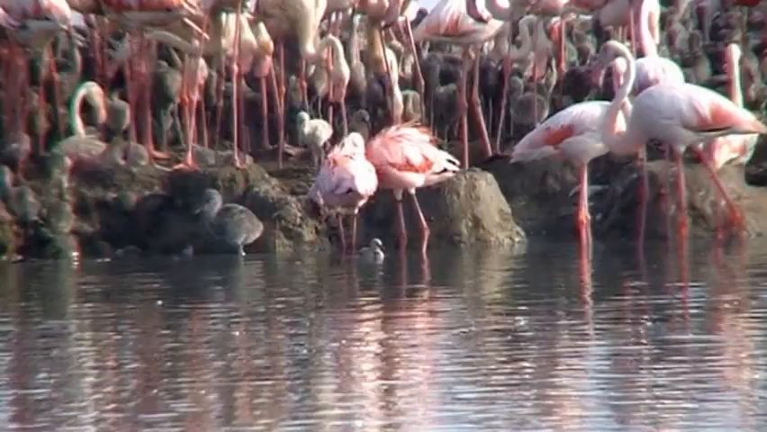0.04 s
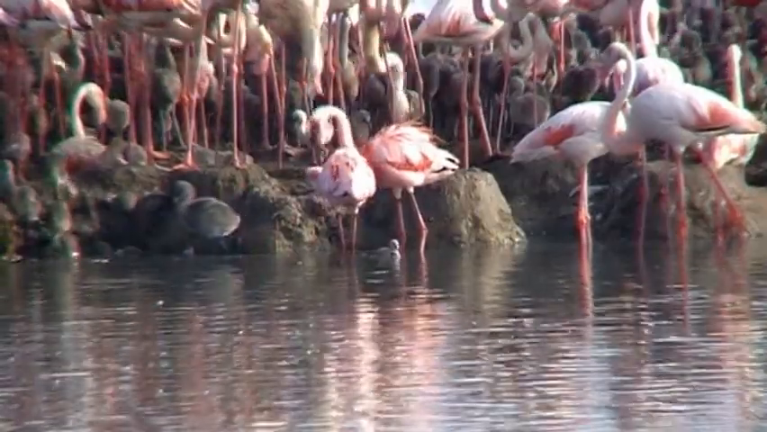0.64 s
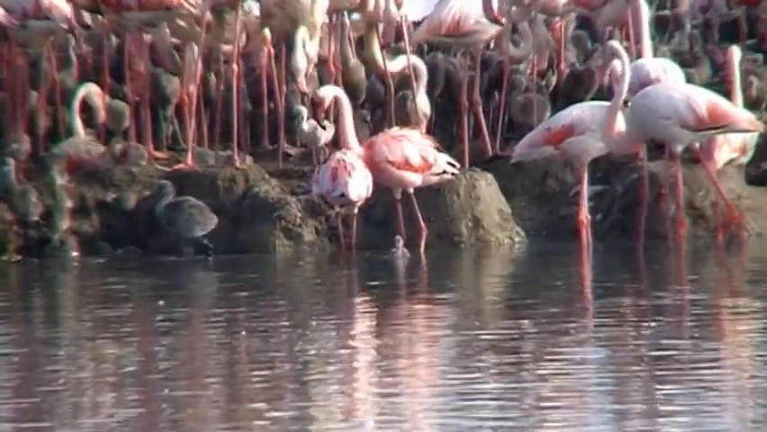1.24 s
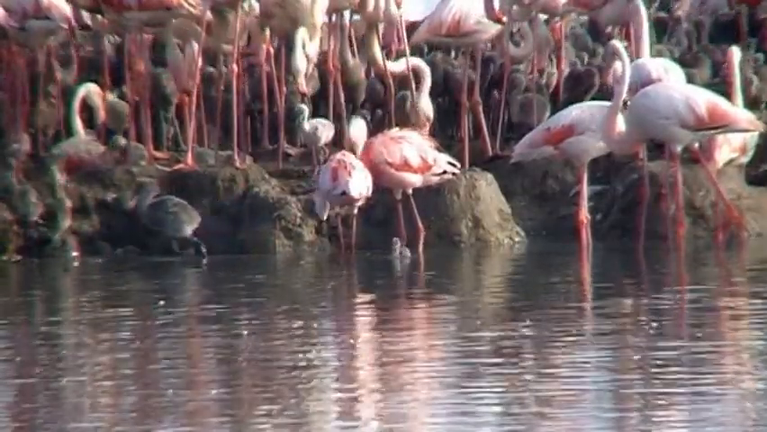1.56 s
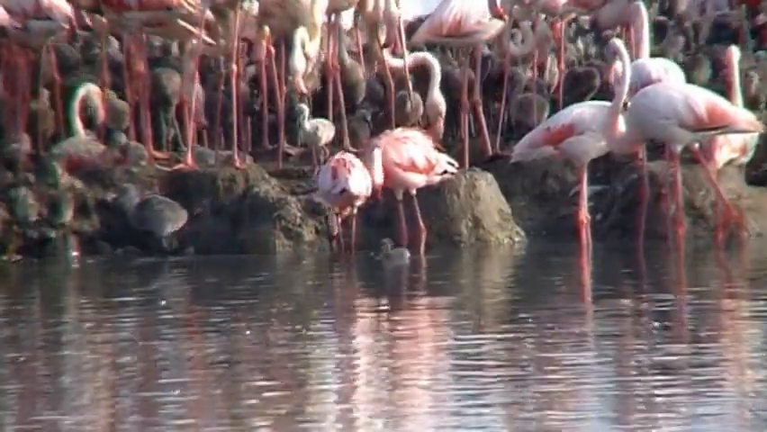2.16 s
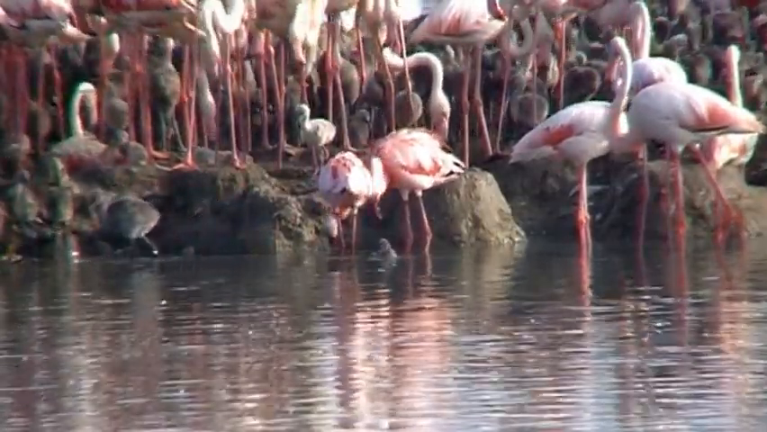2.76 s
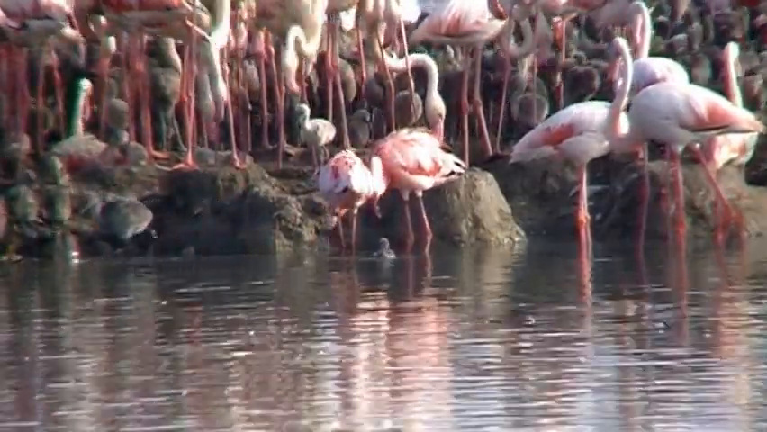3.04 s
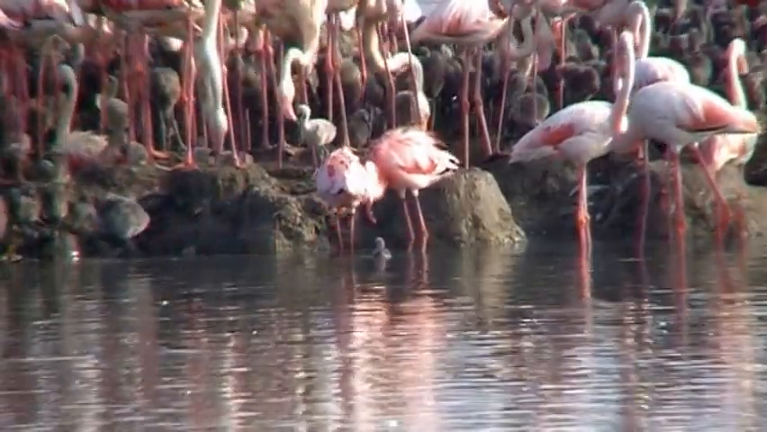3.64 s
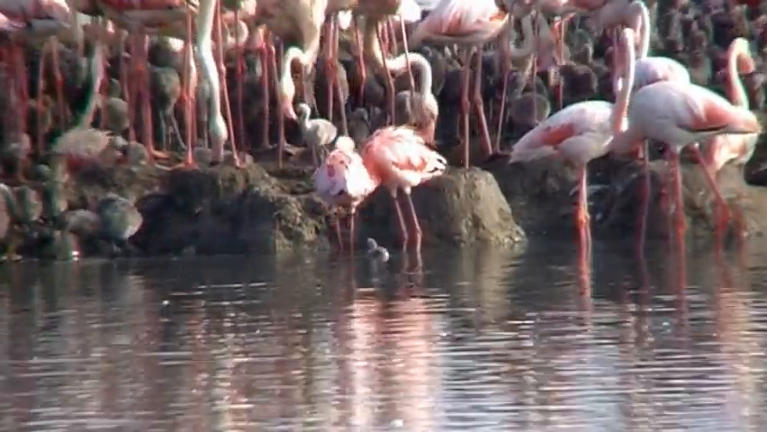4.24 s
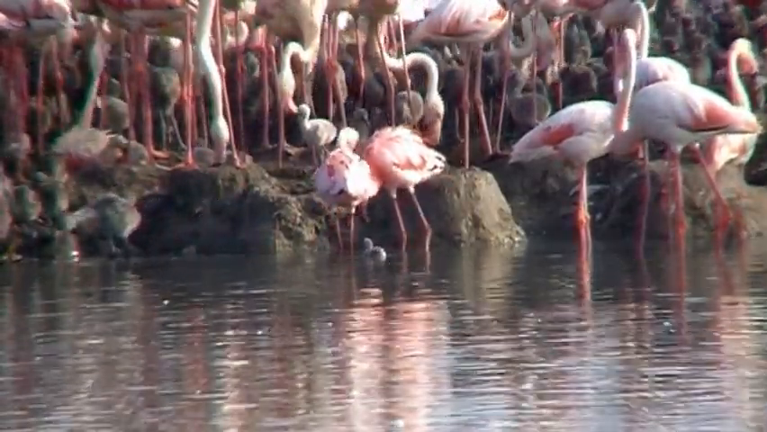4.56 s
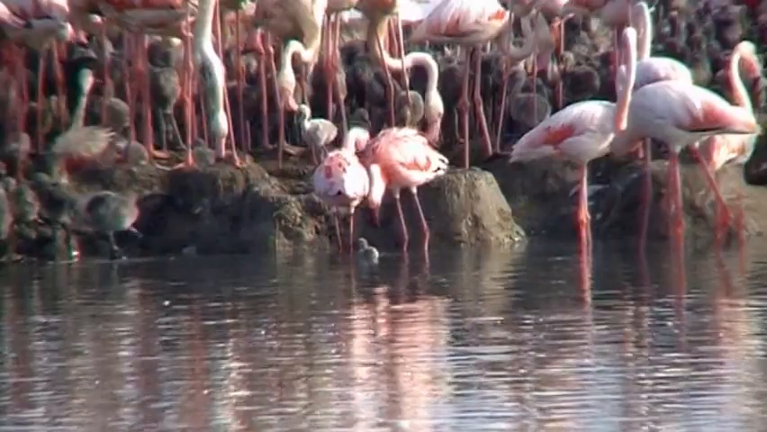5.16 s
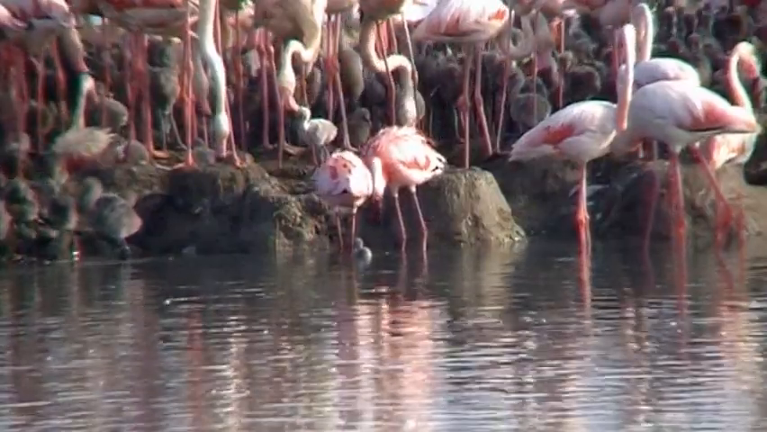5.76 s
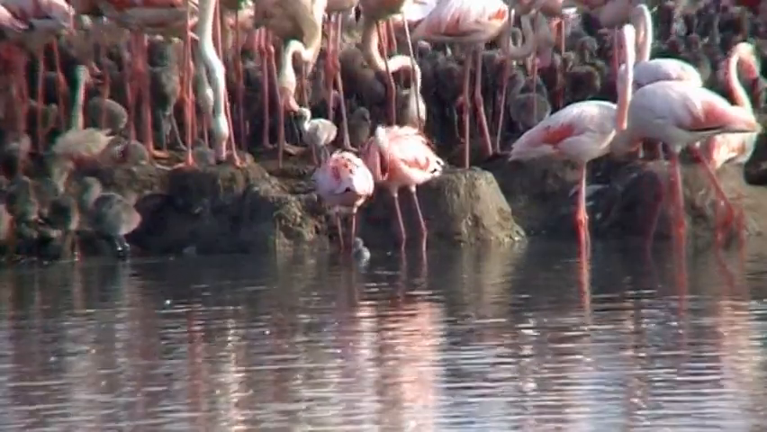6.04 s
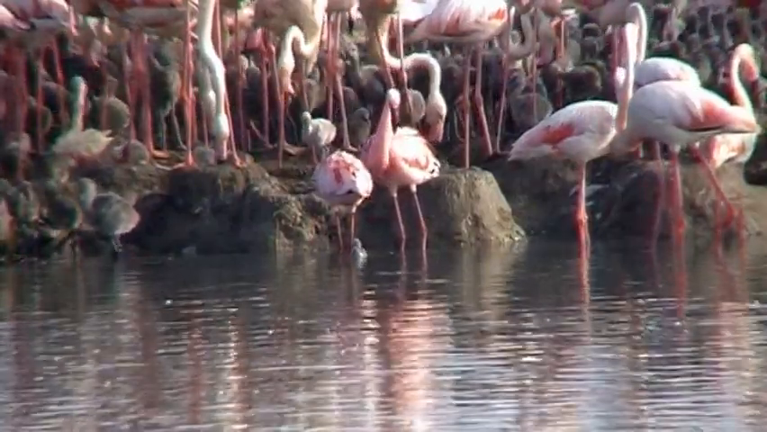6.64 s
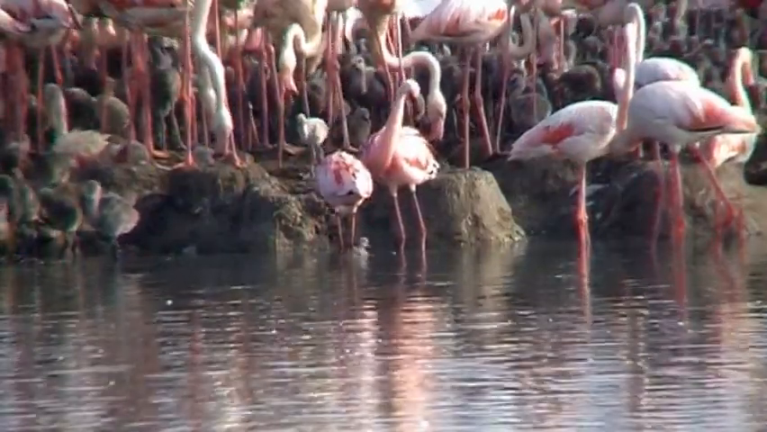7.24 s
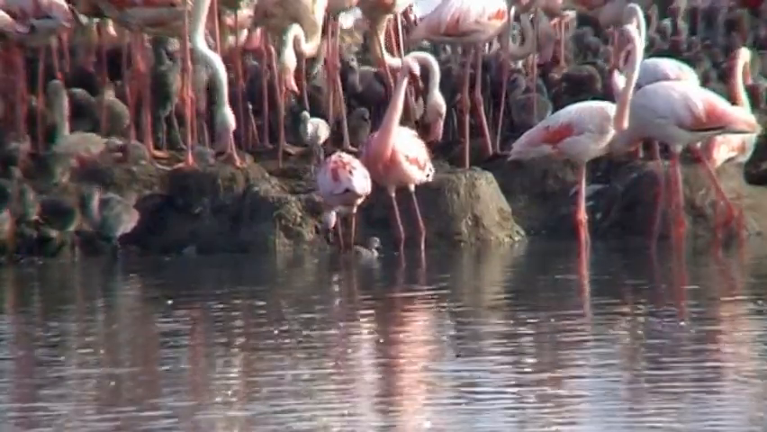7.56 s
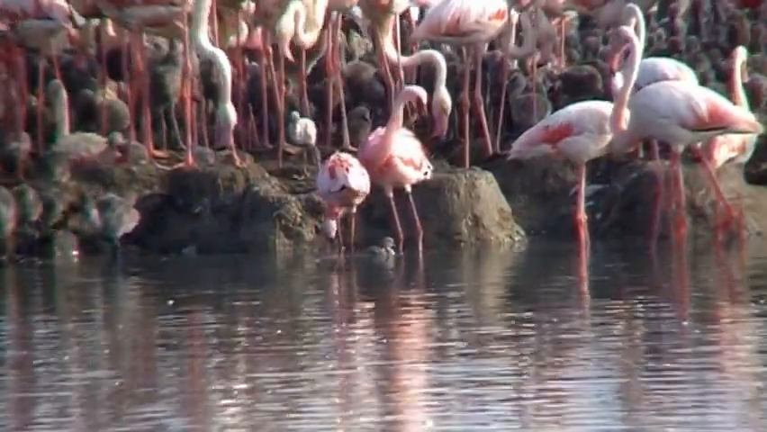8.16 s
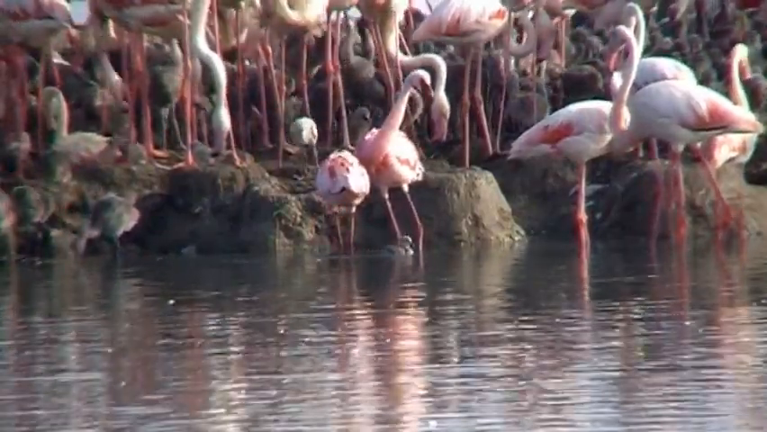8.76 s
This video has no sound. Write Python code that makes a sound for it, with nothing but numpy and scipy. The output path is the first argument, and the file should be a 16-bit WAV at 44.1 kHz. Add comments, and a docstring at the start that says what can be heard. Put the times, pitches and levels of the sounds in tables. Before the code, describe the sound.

From the start, hundreds of flamingos gabble, honk and beg across a strip of water, over a steady open-air hiss and a constant electrical buzz. The din lasts all nine seconds, swelling slightly in frequent brief squabbles, while closer adults give short nasal honks above it. From about 1 second, nearer chicks add short, shrill cries that rise and fall, thickest between 3 and 5.5 seconds. Soft, low wind puffs also touch the microphone from about 1 second, the strongest just after 7. Brief hoarse rasps come around 2 seconds, between 4.3 and 6, and again from 7.4 to 8.4. A thin peep sounds near 5 seconds, and a few faint high tones around 8. The birds have only a slight, short echo. A last squabble lifts the chatter from about 8.5 seconds to the end.

```python
"""A crowded flamingo colony across a strip of water. From the start, hundreds of birds gabble, honk and
beg over open air and a steady electrical buzz; the din swells in squabbles and near adults honk above it.
Each voice is a harmonic source, the syrinx, shaped by resonances of throat or beak. From about 1 s, near
chicks give shrill arched cries and wind puffs softly on the microphone; hoarse rasps soon follow. A thin
peep sounds near 5 s and, after the strongest puff, high tones around 8 s. A squabble ends the scene."""
import sys
import numpy as np
from scipy import signal
from scipy.fft import rfft, irfft, next_fast_len
from scipy.io import wavfile

SR = 44100
rng = np.random.default_rng(int(sys.argv[2]) if len(sys.argv) > 2 else 0)


def pcm_store(signal):
    """Save signal as 16-bit PCM."""
    levels = np.round(np.clip(np.atleast_2d(signal), -1, 1) * 32767)
    wavfile.write(sys.argv[1], SR, levels.astype(np.int16).T)


N = 392931
TIME = np.arange(N) / SR


def amp(db):
    """Amplitude ratio of a level in decibels."""
    return 10 ** (np.asarray(db) / 20)


def unit_rms(x):
    """Normalisation to a root mean square of one."""
    return x / np.sqrt(np.mean(x ** 2) + 1e-20)


def add(mix, t, sound):
    """Linear superposition of a sound centred on time t."""
    start = round(t * SR) - len(sound) // 2
    part = mix[max(start, 0):max(start + len(sound), 0)]
    part += sound[max(-start, 0):][:len(part)]


def filtered(x, gain):
    """Linear filtering: the spectrum is multiplied by gain(f); the result has unit rms."""
    size = next_fast_len(len(x))
    f = np.arange(size // 2 + 1) * SR / size
    return unit_rms(irfft(rfft(x, size) * gain(f), size)[:len(x)])


def coloured(x, spectrum):
    """Spectral shaping by an (f/Hz, level/dB) curve, interpolated in log frequency."""
    hz, db = np.transpose(spectrum)
    return filtered(x, lambda f: amp(np.interp(np.log(f + 1), np.log(hz), db)))


def formant(x, hz, half_width_hz, steep=1):
    """Resonance of throat or beak: a Lorentzian peak whose skirts fall faster as steep grows."""
    return filtered(x, lambda f: (1 + ((f - hz) / half_width_hz) ** 2) ** -steep)


def swell(x, taper):
    """Amplitude envelope: cosine onset and decay together take the fraction taper of a call."""
    return x * signal.windows.tukey(len(x), taper)


def call_seeds(count):
    """An independent random seed for each call."""
    return rng.integers(1 << 30, size=count)


def syrinx(length, hz, sag, rough, jitter, top_hz, seed, rise=0, uneven_db=4):
    """Voiced source: a harmonic series on a gliding fundamental, plus air noise pulsed once a cycle."""
    chance = np.random.default_rng(seed)
    u = np.linspace(-1, 1, max(int(length * SR), 64))  # -1 at the onset, +1 at the end
    tremble = np.interp(u, np.linspace(-1, 1, 16), chance.standard_normal(16))
    pitch_hz = hz * (1 + rise * u - sag * u ** 2) * (1 + jitter * tremble)
    phase = 2 * np.pi * np.cumsum(pitch_hz) / SR
    harmonics = amp(uneven_db * chance.standard_normal(64)) * np.exp(2j * np.pi * chance.random(64))
    count = max(int(top_hz / hz), 1)
    phasor = np.exp(1j * phase)
    tone = (phasor * np.polyval(harmonics[:count][::-1], phasor)).real  # power k is harmonic k
    air = (1 + np.cos(phase)) * chance.standard_normal(len(u))
    return (1 - rough) * unit_rms(tone) + rough * unit_rms(air)


def crowd(pitch_hz, pitch_spread, length, sag, rough, throat_hz, throat_spread, half_width_hz,
          top_hz, spread_db, calls):
    """Incoherent sum: 120 voices, each with its own pitch and throat, at random times and distances."""
    voices = []
    for (long, high, arch, slide, mouth), seed in zip(rng.uniform(-1, 1, (120, 5)), call_seeds(120)):
        source = syrinx(length * 1.5 ** long, pitch_hz * np.exp(pitch_spread * high),
                        sag * (1 + .798 * arch), rough, jitter=.01246, top_hz=top_hz, seed=seed,
                        rise=.5967 * sag * slide)
        voice = formant(source, throat_hz * np.exp(throat_spread * mouth), half_width_hz)
        voices.append(swell(voice, taper=.32))
    out = np.zeros(N)
    for k, (when, who, near) in enumerate(rng.random((calls, 3))):
        t = (k + 2 * when - 1) / calls * N / SR
        add(out, t, amp(spread_db * near ** 2) * voices[int(who * len(voices))])  # most birds are far
    return out


# Spectral weighting of the three parts of the din: f/Hz, relative level/dB
GABBLE_SPECTRUM = [(290, -32), (400, -12.5), (530, -13.5), (620, -3.5), (720, -1.5), (950, -1), (1200, -4),
                   (1600, -3.5), (3000, -36)]
HONKING_SPECTRUM = [(500, -15.5), (900, -0.5), (1250, -1), (1500, 3), (1800, 1), (2300, 0), (2700, 0.5),
                    (4000, -0.5), (8000, -45)]
BEGGING_SPECTRUM = [(500, 6), (740, 5), (1100, 15), (1500, 11), (2300, -0.5), (3000, 4.5), (4500, 1.5),
                    (6500, -5.5), (8000, -2.5), (9700, 1.5), (11500, -3), (13500, -38), (16000, -29)]


def colony():
    """Superposition of three choruses: gabbling adults, honking adults, chicks on nearly one pitch."""
    gabble_lift, honking_lift = squabbles()
    begging_lift = (gabble_lift + honking_lift) / 2  # the chicks join in
    gabble = crowd(pitch_hz=260.05, pitch_spread=.5, length=.076, sag=.1407, rough=.11, throat_hz=790,
                   throat_spread=.42, half_width_hz=540, top_hz=3000, spread_db=7, calls=850)
    honking = crowd(pitch_hz=449, pitch_spread=.35, length=.06, sag=.1604, rough=.24, throat_hz=1614,
                    throat_spread=.37, half_width_hz=750, top_hz=6700, spread_db=7, calls=620)
    begging = crowd(pitch_hz=743.8, pitch_spread=.12, length=.085, sag=.07, rough=.44, throat_hz=5720,
                    throat_spread=.57, half_width_hz=3380, top_hz=14900, spread_db=8, calls=620)
    return (coloured(gabble, GABBLE_SPECTRUM) * amp(-37.5 + gabble_lift)
            + coloured(honking, HONKING_SPECTRUM) * amp(-36 + honking_lift + cackle())
            + coloured(begging, BEGGING_SPECTRUM) * amp(-40 + begging_lift))


# Neighbours setting each other off: centre t/s, duration/s, gabble lift/dB, honking lift/dB
SQUABBLE_LIFTS = [(0.176, 0.16, 4.5, 5), (0.646, 0.35, 0, 4.5), (1.127, 0.25, 4, 2), (1.702, 0.53, 1, 3),
                  (2.183, 0.22, 2.5, 4), (3.05, 0.41, 1, 3.5), (3.627, 0.71, -0.5, 4), (4.366, .54, 2, 4),
                  (5.4, 0.54, 2.5, 1.5), (5.95, 0.17, 1, 6), (6.19, 0.2, 2, 3), (6.756, 0.67, 2.5, 3.5),
                  (7.248, 0.42, -2, 2.5), (7.638, 0.14, 3.5, -1.5), (8.497, 0.32, 3.5, 3.5),
                  (8.885, 0.13, 2, 5)]


def squabbles():
    """Slow amplitude modulation: each squabble is a flat-topped rise and fall of level, in dB."""
    t = TIME[::256]
    centre, length, gabble_db, honking_db = np.transpose(SQUABBLE_LIFTS)
    flare = np.exp(-abs(2 * (t[:, None] - centre) / length) ** 4.7)
    return np.interp(TIME, t, flare @ gabble_db), np.interp(TIME, t, flare @ honking_db)


def cackle(rate_hz=14, spread_hz=9.5, rms_db=1.02):
    """Random amplitude modulation: the quick, uneven syllables of the honking, in dB."""
    return rms_db * filtered(rng.standard_normal(N), lambda f: np.exp(-((f - rate_hz) / spread_hz) ** 2))


# Begging cries: centre t/s, nominal duration/s, peak fundamental f/Hz,
# then f/Hz and relative level/dB for each of the throat, beak and shrill formants
CHICK_CRIES = [(1.081, .08, 662, 1310, -34.5, 3360, -51, 9990, -48),
               (1.15, .06, 787, 780, -49, 3220, -40, 9110, -59),
               (1.221, .115, 657, 1110, -38.5, 3200, -41.5, 9800, -50),
               (1.733, .16, 771, 1360, -39.5, 3880, -56, 9150, -53),
               (1.94, .11, 748, 860, -46, 4310, -70, 9500, -44),
               (2.026, .074, 770, 770, -45, 6180, -61, 9300, -49),
               (2.279, .12, 703, 1150, -40.5, 4350, -58, 8790, -51),
               (2.881, .078, 780, 1490, -37, 3090, -46, 10400, -47.5),
               (3.013, .1, 750, 1470, -42, 5500, -47, 9150, -49.5),
               (3.123, .12, 759, 1450, -37.5, 4900, -46.5, 9500, -44.5),
               (3.254, .066, 754, 1600, -37, 4400, -50, 8190, -67),
               (3.441, .097, 704, 1430, -48, 2810, -51, 8700, -47.5),
               (3.513, .08, 709, 750, -52, 2850, -56, 9300, -51),
               (3.972, .14, 737, 1630, -45, 4700, -49.5, 9710, -59),
               (4.393, .14, 749, 905, -50, 2840, -43, 9720, -56),
               (4.513, .072, 718, 1500, -41.5, 4470, -45.5, 7600, -51),
               (4.627, .085, 700, 1450, -44, 3510, -49, 7850, -46),
               (5.059, .11, 745, 760, -50, 4000, -56, 10200, -47),
               (5.223, .074, 708, 1400, -37.5, 3300, -53, 7810, -47),
               (5.386, .11, 741, 900, -39, 5030, -52, 8960, -55),
               (5.457, .082, 716, 740, -37.5, 3700, -46, 9900, -49),
               (5.499, .098, 751, 1410, -38, 4960, -50, 8660, -54),
               (5.587, .091, 722.5, 900, -45, 3500, -41.5, 9500, -50),
               (6.592, .1, 782, 1480, -37, 3590, -60, 10320, -50),
               (7.021, .082, 707, 1300, -39.5, 4260, -49, 10590, -50),
               (7.889, .11, 726, 725, -49, 3950, -61, 10100, -50.5),
               (8.559, .11, 708, 1300, -36.5, 2080, -44, 8360, -45)]


def near_chicks():
    """Parallel formants: an arched cry excites one resonance of the throat and two of the open beak."""
    out = np.zeros(N)
    for (t, length, hz, *formants), seed in zip(CHICK_CRIES, call_seeds(len(CHICK_CRIES))):
        throat_hz, throat_db, beak_hz, beak_db, shrill_hz, shrill_db = formants
        source = syrinx(length * 1.15, hz, sag=.065, rough=.083, jitter=.0022, top_hz=15500,
                        seed=seed, uneven_db=1.5)
        cry = (amp(throat_db) * formant(source, throat_hz, 530)
               + amp(beak_db) * formant(source, beak_hz, 620, steep=.78)
               + amp(shrill_db) * formant(source, shrill_hz, 1160, steep=.8))
        add(out, t, swell(cry, taper=.47))
    return amp(5) * out


# Nasal honks: centre t/s, duration/s, formant f/Hz, fractional glide from centre to end, level/dB
ADULT_HONKS = [(0.141, 0.066, 1670, 0.083, -33.5), (0.203, 0.052, 1317, 0.026, -34),
               (0.282, .11, 1657, .12, -31.5), (1.006, .06, 2270, 0, -36), (1.559, .075, 1702, 0.082, -33),
               (1.641, 0.051, 1740, 0.059, -30), (1.792, 0.061, 1650, 0, -33),
               (2.071, 0.092, 1747, .07, -32.5), (2.156, 0.043, 2260, -0.016, -34),
               (2.202, 0.057, 1352, -0.037, -31), (2.255, .08, 1840, -.03, -34.5),
               (2.855, .031, 1650, 0.026, -33.5), (2.96, .07, 1780, 0, -32.5),
               (3.193, 0.071, 1645, -0.016, -30.5), (3.285, .07, 1810, .15, -39),
               (3.442, .14, 1770, 0.12, -35), (3.6, .06, 1836, -.05, -34.5), (3.631, .06, 2310, 0, -37),
               (3.73, 0.084, 1760, .12, -34.5), (4.131, 0.093, 1540, -.03, -35.5),
               (4.269, 0.072, 925, 0.074, -35), (4.495, 0.059, 948, .03, -34),
               (4.636, 0.038, 1666, 0.13, -32.5), (5.025, 0.048, 2345, 0, -33.5),
               (5.718, 0.12, 1568, -.09, -34.5), (5.949, .062, 1637, -0.054, -33.5),
               (6.004, 0.1, 1037, 0.025, -36.5), (6.012, 0.029, 2105, -0.13, -28),
               (6.233, 0.038, 993, 0.1, -36), (6.46, 0.073, 1850, 0, -36), (6.593, 0.068, 1804, -.09, -34),
               (6.743, 0.086, 1347, -.12, -38), (6.859, .12, 1720, .03, -38),
               (7.097, 0.054, 1790, 0.19, -37.5), (7.285, .06, 1600, -0.075, -35),
               (7.42, 0.059, 2015, 0.02, -38.5), (7.692, 0.035, 1470, 0.073, -32.5),
               (7.981, 0.073, 1330, -0.028, -32.5), (8.103, 0.031, 1340, -0.047, -31),
               (8.245, .12, 1804, 0.031, -33), (8.296, 0.025, 2380, 0, -32.5),
               (8.468, .09, 912, 0.0041, -32)]


def near_adults():
    """Source and filter: a narrow throat resonance selects the third harmonic of a gliding pitch."""
    out = np.zeros(N)
    for (t, length, hz, rise, db), seed in zip(ADULT_HONKS, call_seeds(len(ADULT_HONKS))):
        source = syrinx(length, hz / 3, sag=.0798, rough=.23, jitter=.028, top_hz=7050,
                        seed=seed, rise=rise, uneven_db=1.5)
        add(out, t, amp(db) * swell(formant(source, hz, 180), taper=.24))
    return out


# Hoarse screeches and a low cackle: centre t/s, duration/s, formant f/Hz, bandwidth/Hz, level/dB
HOARSE_CALLS = [(1.758, .035, 9100, 3500, -36), (2.12, 0.1, 6600, 3200, -41.5),
                (4.332, 0.073, 3660, 3000, -37.5), (4.45, 0.32, 10500, 4000, -48),
                (5.218, .09, 5500, 1000, -41.5), (5.229, .1, 1590, 600, -33.5),
                (5.881, 0.049, 10100, 1200, -43), (5.999, 0.062, 7500, 4000, -39.5),
                (6.112, 0.042, 7500, 3500, -41), (7.358, 0.081, 9600, 1300, -45),
                (7.594, 0.048, 8450, 5000, -43), (8.103, 0.07, 9400, 1200, -42),
                (8.334, .16, 7500, 1800, -46), (8.42, 0.1, 8150, 2600, -40)]


def rasps(rattle_hz=102.5, rattle_depth=.82):
    """Roughness by fast amplitude modulation: a bird's voice breaks into rattling noise."""
    out = np.zeros(N)
    for (t, length, hz, bandwidth, db), seed in zip(HOARSE_CALLS, call_seeds(len(HOARSE_CALLS))):
        source = syrinx(length, 330, sag=.069, rough=.73, jitter=.04, top_hz=15000, seed=seed)
        rattle = 1 + rattle_depth * np.cos(2 * np.pi * rattle_hz * TIME[:len(source)])
        add(out, t, amp(db) * swell(formant(source * rattle, hz, bandwidth / 2), taper=.27))
    return out


# A peep with its high overtone, then high tones, two of them ringing overtones of honks:
# centre t/s, duration/s, peak f/Hz, fractional pitch sag at the ends, level/dB
THIN_TONES = [(4.843, 0.065, 9500, 0.05, -39), (4.847, 0.063, 2400, .08, -41),
              (7.914, 0.088, 5340, 0.04, -48), (7.986, 0.031, 5330, 0.07, -42),
              (8.104, 0.035, 5380, 0.04, -41.5), (8.226, .08, 5470, 0.03, -47)]


def thin_tones():
    """Frequency modulation: each thin tone is a single partial whose pitch arches and trembles."""
    out = np.zeros(N)
    for (t, length, hz, sag, db), seed in zip(THIN_TONES, call_seeds(len(THIN_TONES))):
        partial = syrinx(length, hz, sag, rough=0, jitter=.017, top_hz=0, seed=seed)
        add(out, t, amp(db) * swell(partial, taper=.13))
    return out


def bank_echoes(x, t60_s=.35):
    """Scattering from mud banks and birds' bodies: sparse reflections that decay exponentially."""
    t = TIME[:SR // 2]
    reflections = rng.standard_normal(len(t)) * (rng.random(len(t)) < .05) * (t > .004)
    decay = np.exp(-np.log(1000) * t / t60_s)
    response = unit_rms(reflections * decay) / np.sqrt(len(t))  # unit energy
    return signal.fftconvolve(x, response)[:N]


def buzz(rate_hz=51.2695, first_s=.00057, on_s=.003143):
    """Pulse train: a switched supply leaks a click at turn-on and a weaker, opposite one at turn-off."""
    clicks = np.zeros(N)
    taps = np.arange(-16, 17)
    starts = np.arange(first_s + 1 / rate_hz, N / SR - .01, 1 / rate_hz)
    for delay, height in ((0, -1), (on_s, .63)):
        position = (starts + delay)[:, None] * SR
        index = np.round(position).astype(int) + taps
        clicks[index] += height * np.sinc(index - position) * np.hanning(len(taps))  # band-limited
    rounded = np.convolve(clicks, [.19, .62, .19], "same")
    return .26 * signal.lfilter(*signal.butter(1, 200, "high", fs=SR), rounded)


# Puffs of wind on the microphone: onset t/s, envelope peak level/dB
WIND_PUFFS = [(0.909, -48), (1.131, -39), (1.297, -40), (1.409, -42), (2.4, -35), (2.658, -31),
              (2.699, -38), (3.326, -38), (3.419, -37), (3.772, -32), (5.172, -42), (5.339, -39),
              (5.639, -39), (5.769, -36), (7.229, -28)]


def wind(rise_s=.0104, half_length_s=.0041):
    """Pressure fluctuations at the microphone: Gaussian thuds of 90-135 Hz over a faint, lumpy rumble."""
    thuds = np.zeros(N)
    t = np.arange(-SR // 25, SR // 25) / SR
    envelope = np.exp(-(t / half_length_s) ** 2)
    for (onset, db), (pitch, phase) in zip(WIND_PUFFS, rng.random((len(WIND_PUFFS), 2))):
        thud = envelope * np.cos(2 * np.pi * ((90 + 45 * pitch) * t + phase))
        add(thuds, onset + rise_s, amp(db) * thud)
    lumps_db = 4.5 * filtered(rng.standard_normal(N), lambda f: np.exp(-(f / 14) ** 2))
    breeze = sum(np.exp(-((TIME - onset) / .082) ** 2) for onset, _ in WIND_PUFFS)
    low_noise = filtered(rng.standard_normal(N), lambda f: 1 / (1 + ((f - 85) / 70) ** 2))
    rumble = (amp(-75.5) + amp(-61.5) * breeze) * low_noise * amp(lumps_db)
    return signal.sosfilt(signal.butter(2, 44, "high", fs=SR, output="sos"), thuds + rumble)


# Spectrum of the open air: f/Hz, relative level/dB
AIR_SPECTRUM = [(20, -24), (60, -15), (130, -2.5), (260, -4), (420, 1.5), (2000, 10.5), (6000, -18),
                (11000, -12.5), (16000, -32)]


def open_air():
    """Stationary ambient noise: a broad hiss, strongest near 2 kHz."""
    return amp(-39.5) * coloured(rng.standard_normal(N), AIR_SPECTRUM)


def scene():
    """Superposition of the birds, their echoes, open air and wind in one channel."""
    birds = near_chicks() + near_adults() + rasps() + thin_tones() + colony()
    bass_cut = signal.butter(4, 320, "high", fs=SR, output="sos")  # small throats radiate no bass
    birds = signal.sosfilt(bass_cut, birds)
    return (birds + amp(-10) * bank_echoes(birds) + open_air() + wind())[None]


def record(dry):
    """Electrical interference, gating and band limiting: the buzz joins, and the input opens at 36 ms."""
    gate = np.clip((TIME - .036) / .002, 0, 1)
    low_pass = signal.firwin(511, 15850, window=("kaiser", 9), fs=SR)
    return signal.oaconvolve((dry + buzz()) * gate, low_pass[None], "same")


dry = scene()
out = record(dry)
pcm_store(out)
```